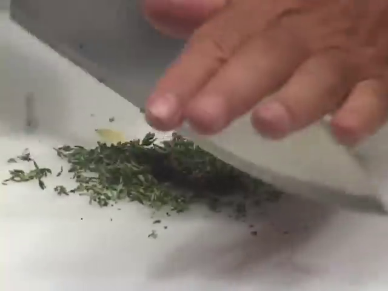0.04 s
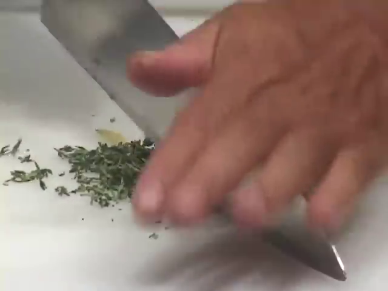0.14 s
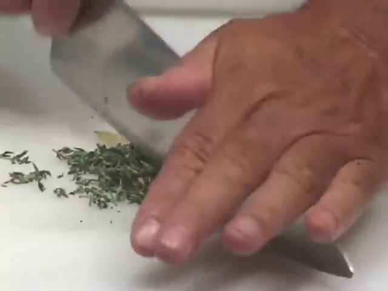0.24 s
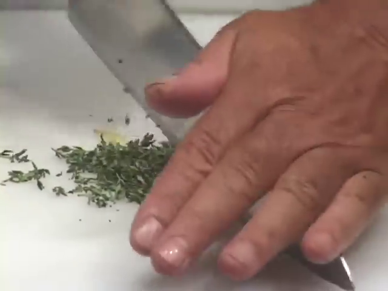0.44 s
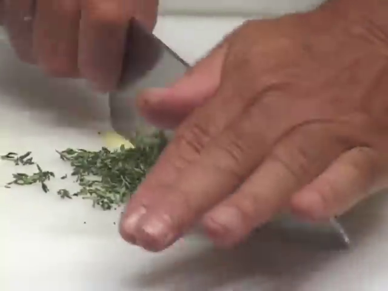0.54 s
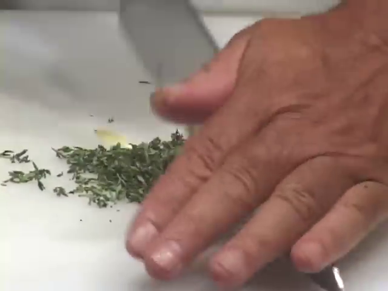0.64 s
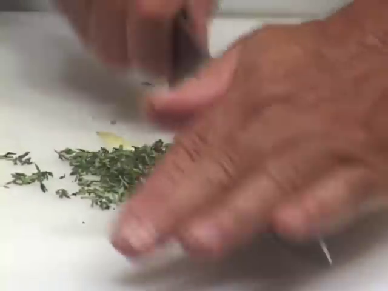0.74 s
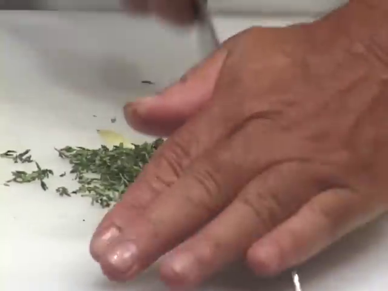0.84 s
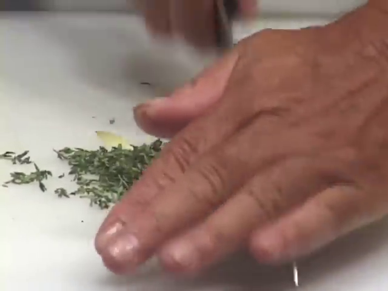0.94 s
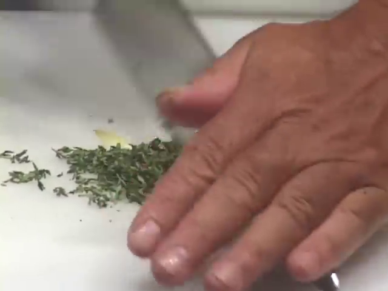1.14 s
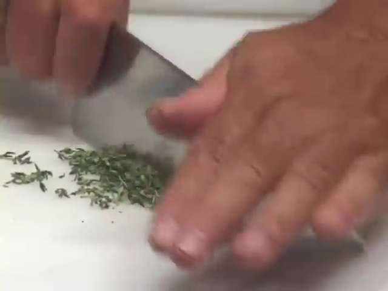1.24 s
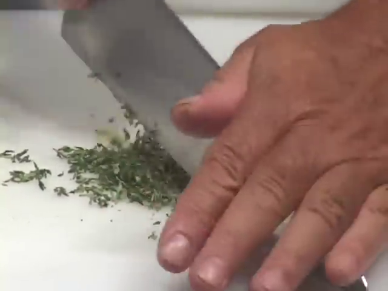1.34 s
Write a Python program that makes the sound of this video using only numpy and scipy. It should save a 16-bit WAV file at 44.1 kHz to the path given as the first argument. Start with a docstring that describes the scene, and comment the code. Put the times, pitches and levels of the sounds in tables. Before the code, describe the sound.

Knife chopping on a plastic cutting board in a quiet kitchen: a loud crack, light crunching of herbs with faint blade clinks, then two more knocks. The left side sounds bright and echoing, the right close and dull.

```python
"""A chef's knife chops herbs on a plastic board. Over a faint kitchen hush, one hard chop cracks into
the plastic at 0.22 s and a softer knock follows. From 0.6 s stems snap, leaves crunch, the steel blade
clinks and its dragging edge squeaks faintly. At 1.06 s and 1.31 s two more knocks shake the board
and the counter. The left microphone, about two metres off, sounds bright and full of the kitchen's
echo; the right one is close, dry and dull."""
import sys
import numpy as np
from scipy import signal
from scipy.fft import rfft, irfft, next_fast_len
from scipy.io import wavfile

SR = 44100
rng = np.random.default_rng(int(sys.argv[2]) if len(sys.argv) > 2 else 0)


def materialize(psi):
    """Save the field psi as 16-bit PCM at rate SR to the path in sys.argv[1].

    A 1-D psi becomes a single channel; in a 2-D psi each row is a channel.
    """
    bounded = np.clip(np.atleast_2d(psi).T, -1, 1)
    quanta = np.round(bounded * 32767).astype(np.int16)
    wavfile.write(sys.argv[1], SR, quanta)


N = 61739
LEAD_S = 0.25  # extra time before the start, so an earlier knock can still be echoing
LEAD = int(LEAD_S * SR)
SIZE = N + LEAD
T = np.arange(SIZE) / SR


def undb(db):
    """Turn decibels into a number to multiply by."""
    return 10 ** (np.asarray(db) / 20)


def along(table, hz):
    """Read between the rows of a (pitch_hz, value) table, with octaves evenly spaced."""
    pitches, values = np.array(table, float).T
    return np.interp(np.log(hz + 1), np.log(pitches), values)


def colour(x, table, tilt_db=0, unit_power=False):
    """Filter by a (pitch_hz, level_db) table, adding tilt_db for each octave above 1000 Hz."""
    size = 2 * next_fast_len(SIZE)
    hz = np.arange(size // 2 + 1) * SR / size
    gain = undb(along(table, hz) + tilt_db * np.log2(np.maximum(hz, 1000) / 1000))
    if unit_power:
        gain = gain / np.sqrt(np.mean(gain ** 2))
    # make the filter ring only after a sound, never before it
    cepstrum = irfft(np.log(gain))
    cepstrum[1:size // 2] *= 2
    cepstrum[size // 2 + 1:] = 0
    return irfft(rfft(x, size) * np.exp(rfft(cepstrum)))[:SIZE]


def convolve(x, response):
    """Let every sample of x set off the given ring or echo."""
    return signal.fftconvolve(x, response)[:SIZE]


def late(x, delay_s):
    """Make a sound start later."""
    return np.concatenate([np.zeros(max(int(delay_s * SR), 0)), x])[:SIZE]


def ring(modes):
    """Tones of a struck object start together; fade_s is the time each takes to drop 60 dB."""
    return sum(undb(db - 60 * T / fade_s) * np.sin(2 * np.pi * hz * T) for hz, fade_s, db in modes)


def swell(start_s, length_s):
    """A rounded rise and fall in loudness."""
    progress = np.clip((T - LEAD_S - start_s) / length_s, 0, 1)
    return np.sqrt(np.abs(np.sin(np.pi * progress)))


def room_tone():
    """The kitchen's steady hush: separate noise at the far and the near microphone."""
    # tone colour of the hush at each microphone: pitch_hz, relative_db
    far_tone = [(30, -20.5), (110, -23.5), (270, 8), (600, 5.5), (1000, -1), (2000, -8), (4000, -14.5),
                (6000, -22.5), (8000, -27.5), (13000, -40.5)]
    near_tone = [(30, -14), (150, 6.5), (300, 8), (550, 6.5), (1000, 2.5), (2000, -15), (4000, -20),
                 (8000, -24.5), (13000, -30)]
    return np.array([undb(db) * colour(rng.standard_normal(SIZE), tone, unit_power=True)
                     for tone, db in ((far_tone, -61.5), (near_tone, -69))])


def echo_tail(fades, build_s=0.0026):
    """Countless echoes blur into noise; each half octave fades as the (pitch_hz, fade_s) table says."""
    noise = rfft(rng.standard_normal(SIZE))
    hz = np.arange(SIZE // 2 + 1) * SR / SIZE
    bands = np.round(2 * np.log2(np.maximum(hz, 100)))
    tail = 0
    for band in np.unique(bands):
        fade_s = along(fades, 2 ** (band / 2))
        tail = tail + irfft(noise * (bands == band), SIZE) * undb(-60 * T / fade_s)
    tail = tail * (1 - np.exp(-T / build_s))
    return tail / np.sqrt(np.sum(tail ** 2))


def room_echo(x, reflections, fades, tail_db):
    """The kitchen sends back a few distinct echoes and a blurred tail."""
    first_echoes = sum(undb(db) * late(x, delay_s) for delay_s, db in reflections)
    return first_echoes + undb(tail_db) * convolve(x, echo_tail(fades))


def squeaks(width_hz=100):
    """Steel dragging on plastic briefly rubs one narrow tone into sounding."""
    # squeaks and groans: start_s, length_s, pitch_hz, level_db
    drags = [(0.846, 0.029, 1450, -54), (1.122, 0.13, 2304, -59), (1.1, 0.091, 2960, -59),
             (1.309, 0.056, 428, -56)]
    out = 0
    for start_s, length_s, hz, db in drags:
        tone = np.exp(-np.pi * width_hz * T) * np.cos(2 * np.pi * hz * T)
        rubbing = rng.standard_normal(SIZE) * swell(start_s, length_s)
        out = out + undb(db) * convolve(rubbing, tone / np.sqrt(np.sum(tone ** 2)))
    return out


def blade_clinks(fade_s=0.125, rise_s=0.00061):
    """The edge breaks through a stem and taps the board; where it touches decides how the steel rings."""
    # tones of the blade, touched at the heel (handle end) or tip: pitch_hz, heel_db, tip_db
    blade_tones = [(1775, -3.5, -11), (2197, -22, -3), (2473, -2.5, -19.5), (2985, -27.5, 0.5),
                   (3432, -7, -0.5), (3637, -0.5, -9), (4230, -2.5, -26), (5050, -22, -3.5)]
    # light taps: start_s, level_db, place (0 heel to 1 tip)
    taps = [(0.6112, -55, 0), (0.6266, -51.5, 0), (0.839, -54.5, 0.93), (1.056, -49, 0.78),
            (1.3054, -48, 0.2)]
    soft_start = 1 - np.exp(-T / rise_s)  # each clink swells in over a fraction of a millisecond
    out = 0
    for start_s, db, place in taps:
        modes = [(hz, fade_s, np.interp(place, [0, 1], [heel_db, tip_db]))
                 for hz, heel_db, tip_db in blade_tones]
        out = out + undb(db) * late(ring(modes) * soft_start, LEAD_S + start_s)
    return out


def herb_crunch(cracks_per_s=1300, spread_db=4.5, snap_s=0.0025):
    """Cut leaves give a shower of tiny cracks; a thick stem gives one sharp burst."""
    # the edge pressing through leaves: start_s, length_s, level_db, tilt_db_per_octave
    cuts = [(-0.01, 0.047, -62.5, -3), (0.2211, 0.0071, -26.5, -10.5), (0.245, 0.036, -66, 2),
            (0.377, 0.024, -59.5, 1.5), (0.596, 0.054, -59, -1.5), (0.832, 0.038, -54.5, -6),
            (1.047, 0.034, -48.5, -7), (1.107, 0.11, -51.5, -8), (1.19, 0.18, -60.5, -13.5),
            (1.294, 0.024, -48.5, -2.5), (1.305, 0.14, -57.5, -11)]
    # single stems snapping: start_s, level_db, tilt_db_per_octave
    snaps = [(0.6089, -42, -3), (0.6259, -42, 1), (0.839, -52.5, 5), (0.934, -65.5, 15.5),
             (0.9931, -53.5, 11), (1.056, -49.5, 4.5), (1.16, -57, 14), (1.173, -70, 20),
             (1.3068, -42.5, -1.5)]
    # tone colour of leaves crushed against the blade: pitch_hz, relative_db
    leaf_colour = [(50, -54.5), (250, -29), (700, -2.5), (1500, -3), (2400, 0.5), (2900, 2.5), (3600, 4),
                   (4300, 5.5), (5600, -6.5), (6400, -4.5), (7100, -36.5), (9300, -37), (9800, -7.5),
                   (10600, -28), (11350, -1.5), (12000, -20.5), (12600, -17), (13500, -35.5)]
    out = 0
    for start_s, length_s, db, tilt_db in cuts:
        clicks = (rng.random(SIZE) < cracks_per_s / SR) * rng.choice([-1, 1], SIZE)
        cracks = clicks * undb(spread_db * rng.standard_normal(SIZE))
        shower = cracks / cracks.std() * swell(start_s, length_s)
        out = out + undb(db) * colour(shower, leaf_colour, tilt_db, unit_power=True)
    for start_s, db, tilt_db in snaps:
        burst = late(rng.standard_normal(SIZE) * np.exp(-T / snap_s), LEAD_S + start_s)
        out = out + undb(db) * colour(burst, leaf_colour, tilt_db, unit_power=True)
    return out


def board_ring(modes, far, lowest_hz=326):
    """The struck board rings with little bass, because air slips round so small an object."""
    ringing = ring([(hz, fade_s, db + far * extra_db) for hz, fade_s, db, extra_db in modes])
    return signal.sosfilt(signal.butter(3, lowest_hz, "high", fs=SR, output="sos"), ringing)


def knife_knocks(far):
    """Each blow rings board, edge and counter, heard close up (far=0) or across the room (far=1)."""
    # blows of the knife: start_s, thud_db, clack_db, bump_db, contact_s
    blows = [(-0.14, -5, -1.5, 5, 0.0011), (0.225, -37, -5, 0, 0.00013), (0.394, -17, -33, 2, 0.00065),
             (1.0605, 7, -23, -3, 0.0012), (1.309, -9.5, -26.5, -2.5, 0.0019)]
    # low tones of the board: pitch_hz, fade_s, level_db, far_extra_db
    board_tones = [(371, 0.083, -51.5, -3.5), (486, 0.054, -26.5, 2), (496, 0.052, -27.5, 5.5),
                   (1048, 0.022, -36, 9.5), (1515, 0.021, -32, 15)]
    # short tones of the edge hitting plastic: pitch_hz, fade_s, level_db, far_extra_db
    edge_tones = [(600, 0.071, -21.5, -5), (741, 0.018, -15, 2), (890, 0.02, -10.5, -5),
                  (1137, 0.024, -16, -1.5), (1450, 0.01, -6, -4), (1754, 0.02, -13, 0),
                  (2280, 0.018, -46, -1), (4170, .009, -26, -1), (4950, 0.0043, -17, 1)]
    # tones of the counter under the board: pitch_hz, fade_s, level_db
    counter_tones = [(75, 0.18, -46.5), (160, 0.062, -44), (351, 0.019, -33.5)]
    thud, clack, bump = board_ring(board_tones, far), board_ring(edge_tones, far), ring(counter_tones)
    out = 0
    for start_s, thud_db, clack_db, bump_db, contact_s in blows:
        push = T * np.exp(-T / (contact_s / 4))  # a longer contact sounds duller
        body = undb(thud_db) * thud + undb(clack_db) * clack + undb(bump_db) * bump
        out = out + late(convolve(body, push / push.sum()), LEAD_S + start_s)
    return out


def chop_crack(start_s=0.2247, peak_db=-8):
    """The hard chop: one sharp pulse of pressure as the edge bites into the plastic."""
    # tone colour of the crack: pitch_hz, relative_db
    crack_colour = [(60, -7.5), (500, -17.5), (1000, 24), (1550, 23), (2300, 3), (4300, -5.5),
                    (6500, -19.5), (9000, -34.5), (14000, -30.5)]
    pulse = colour(signal.unit_impulse(SIZE), crack_colour)
    return late(undb(peak_db) * pulse / np.abs(pulse).max(), LEAD_S + start_s)


def scene():
    """The far microphone (left) hears it all later, with echo; the near one (right) mostly the board."""
    # first echoes at each microphone: delay_s, level_db
    far_echoes = [(.0056, -18), (.0215, -23), (.0335, -17), (.0503, -11.5)]
    near_echoes = [(0.009, -17.5), (0.018, -12), (0.0264, -21)]
    # how long the kitchen rings at each microphone: pitch_hz, fade_s
    far_fades = [(150, 0.77), (500, 0.34), (900, 0.43), (1500, 0.43), (2300, .44), (4000, 0.48),
                 (7000, 0.14), (12000, 0.4)]
    near_fades = [(150, 0.68), (350, 0.24), (700, 0.15), (1100, 0.37), (1600, 0.24), (2300, 0.12),
                  (4000, 0.2), (7000, 0.049)]
    # tone colour of each microphone: pitch_hz, level_db
    far_mic = [(60, -43.5), (150, -28), (300, -6), (480, -9.5), (650, -4.5), (1000, 6.5), (1600, -0.5),
               (2600, 4), (4500, -1.5), (6300, -10.5), (7500, -30.5), (11500, -14.5), (14000, -13)]
    near_mic = [(60, -32.5), (150, -12.5), (300, -3.5), (480, 1), (1600, 2.5), (2300, -6.5), (3900, 0.5),
                (5000, -33.5), (8000, -18.5), (14000, -16)]
    cutting = herb_crunch() + blade_clinks() + squeaks()
    knocks = knife_knocks(far=1)
    crack = chop_crack()
    # the walls return only the middle pitches of the crack
    wall_filter = signal.butter(3, (600, 5500), "band", fs=SR, output="sos")
    wall_crack = signal.sosfilt(wall_filter, crack)

    far = colour(undb(-6.5) * knocks + room_echo(knocks, far_echoes, far_fades, tail_db=1.5), far_mic)
    far += crack + room_echo(wall_crack, far_echoes, far_fades, tail_db=-0.5)
    far += cutting + undb(-7) * convolve(cutting, echo_tail([(1000, 0.31)]))  # same fade at all pitches

    close = knife_knocks(far=0) + undb(-30.5) * cutting + undb(-32) * crack
    near = colour(close + room_echo(close, near_echoes, near_fades, tail_db=-8.5), near_mic)
    stereo = np.array([late(far, delay_s=0.0058), near]) + room_tone()
    return stereo[:, LEAD:]


def record(dry):
    """The recorder cuts off the treble above 13700 Hz."""
    return signal.sosfilt(signal.ellip(8, 0.2, 70, 13700, fs=SR, output="sos"), dry)


dry = scene()
out = record(dry)
materialize(out)
```